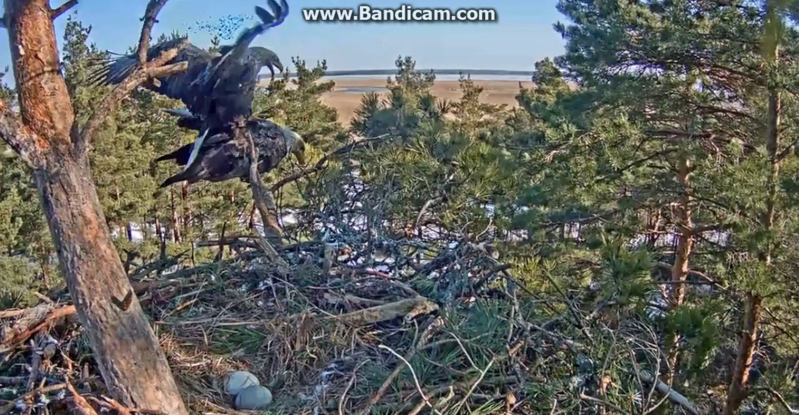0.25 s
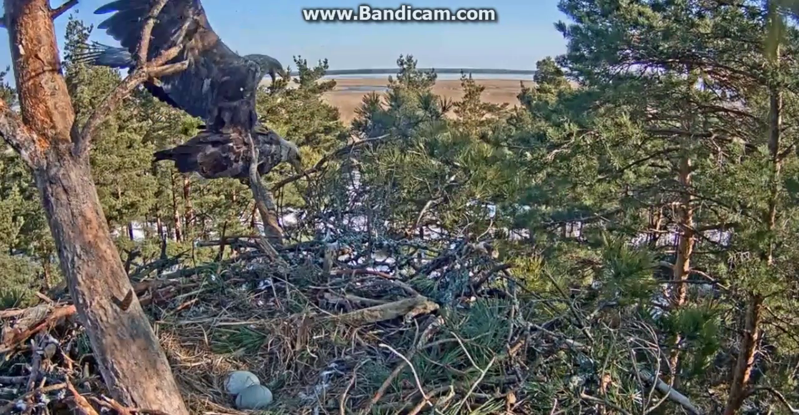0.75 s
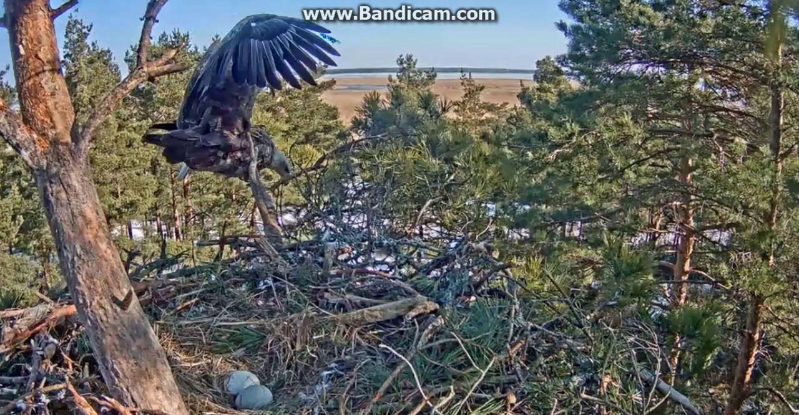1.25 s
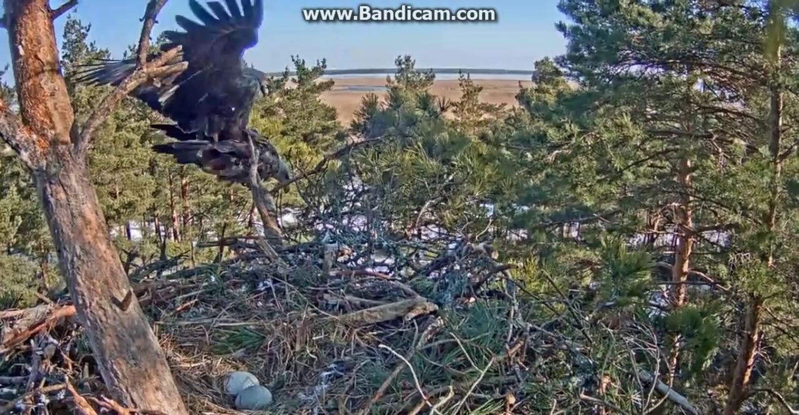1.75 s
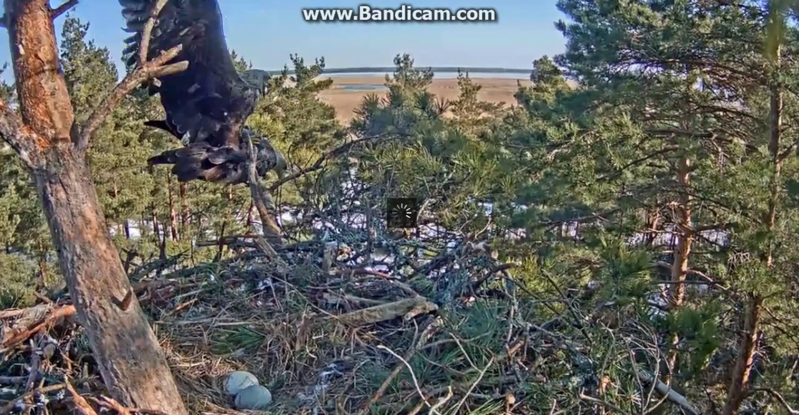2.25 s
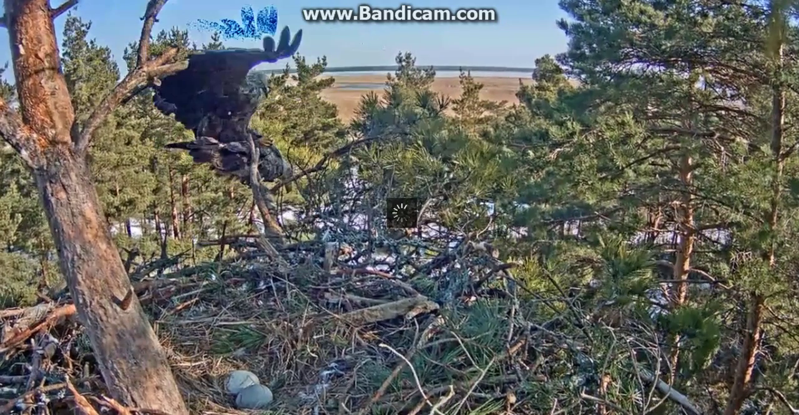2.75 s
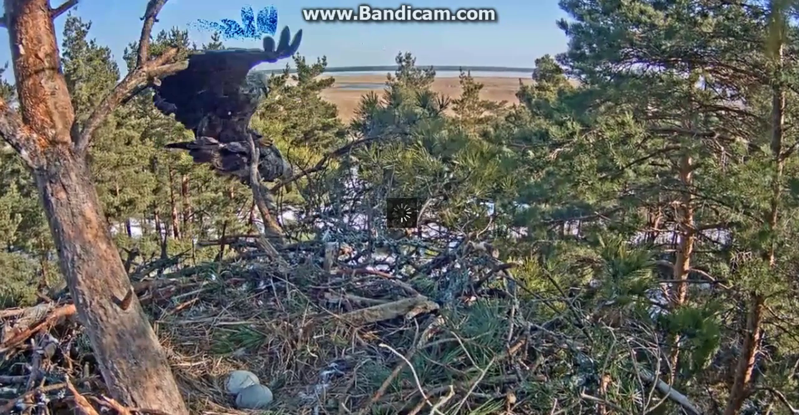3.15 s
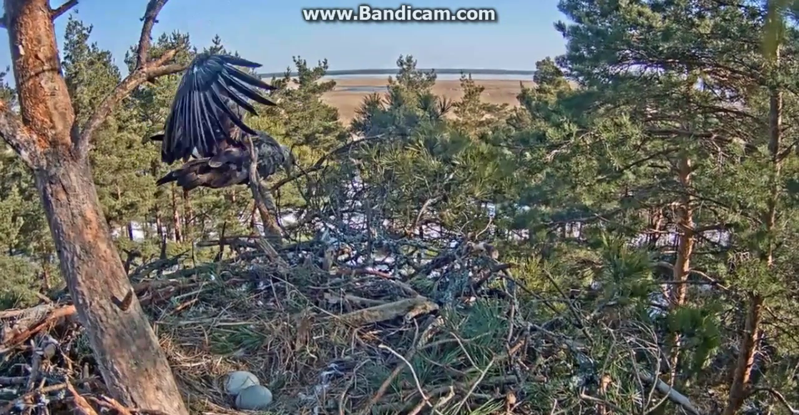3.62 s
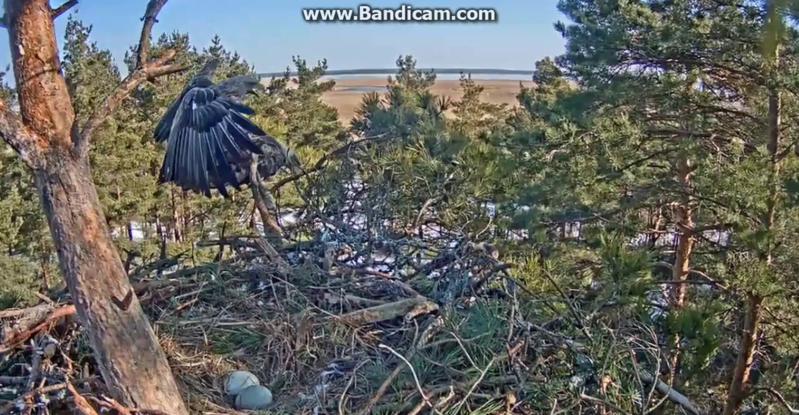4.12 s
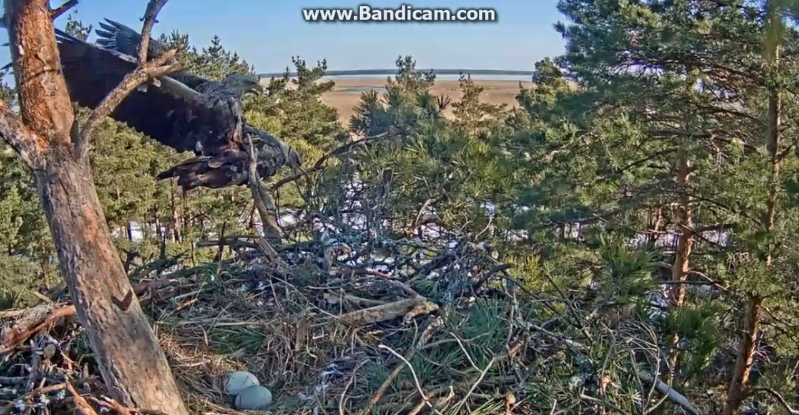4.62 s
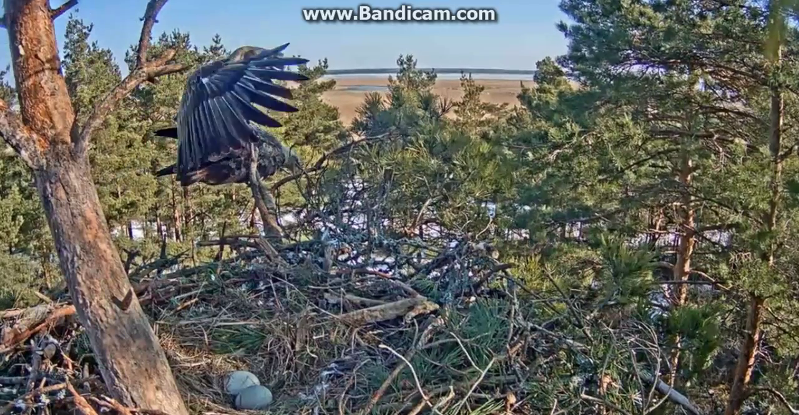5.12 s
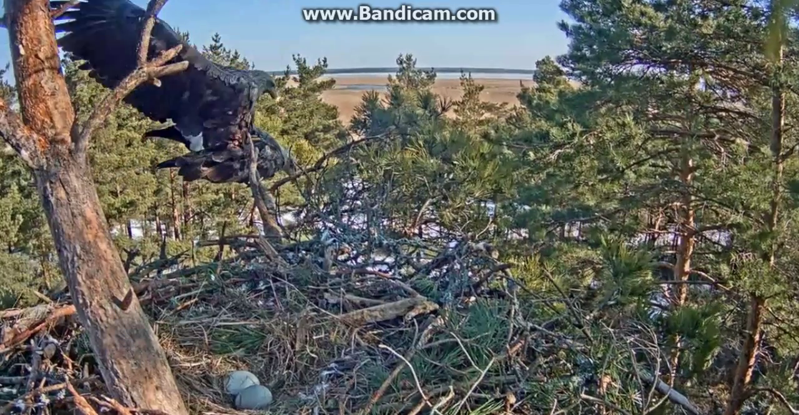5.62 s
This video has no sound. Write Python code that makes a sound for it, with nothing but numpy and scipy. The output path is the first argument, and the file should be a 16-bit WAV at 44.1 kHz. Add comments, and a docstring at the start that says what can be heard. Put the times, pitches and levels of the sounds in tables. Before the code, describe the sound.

Outdoors in a pine wood, a microphone by a nest picks up two eagles. The tail of a yelp is already sounding at the start, with a strong wing buffet. Short arched yelps follow at about 0.2, 0.6, 1.0, 1.3, 1.6 and 1.9 seconds, most cracking from a full, rough voice into a thin squeal, each ringing briefly in the trees. Low flaps and rustling feathers run beneath, with a hollow knock near 1.5. Tiny dropouts chop the sound early on, including a tenth-of-a-second gap at 0.9. From 2.15 to 3.3 the live sound stops, leaving faint flickering hiss. It returns abruptly with three plainer, lower, hoarse yelps at about 3.3, 3.7 and 4.1. Calling then ends. Soft wingbeats, rustle and light breeze continue, with two short dropouts near 4.5 and 4.9, muffled thuds from 4.7 onward, and a firm low knock with a dry snap at 5.8.

```python
"""Eagles mating above their nest

Two eagles in a pine wood give runs of arched yelps, harmonic tones with rough noise; the early ones crack
up into a thin squeal, and decaying filtered noise makes the trees ring after each. Shaped noise gives the
wingbeats, the rustle and the breeze; damped noise bursts give knocks and snaps on the branch. The nest
camera's live sound stalls several times, leaving a faint hiss, and the longest stall loses a little."""
import sys
import numpy as np
from scipy import signal
from scipy.fft import rfft, irfft, next_fast_len
from scipy.io import wavfile
from scipy.ndimage import uniform_filter1d, map_coordinates

SR = 44100
rng = np.random.default_rng(int(sys.argv[2]) if len(sys.argv) > 2 else 0)


def materialize(psi):
    """Save the field psi as 16-bit PCM at rate SR to the path in sys.argv[1].

    A 1-D psi becomes a single channel; in a 2-D psi each row is a channel.
    """
    bounded = np.clip(np.atleast_2d(psi).T, -1, 1)
    quanta = np.round(bounded * 32767).astype(np.int16)
    wavfile.write(sys.argv[1], SR, quanta)


N = 258867  # length of the scene [samples]
BREAK_HZ = 1750  # the voice flips register here
# stalls of the live sound: (start [s], end [s])
STALL_SPANS = [(.019, .058), (.259, .267), (.419, .43), (.879, .987), (2.149, 3.295), (4.482, 4.575),
               (4.93, 4.98)]


def amp(db):
    """Level to amplitude: 20 dB is a factor of ten."""
    return 10 ** (np.asarray(db) / 20)


def unit(x):
    """Normalisation of mean power: the signal scaled to rms 1."""
    return x / np.sqrt(np.mean(x ** 2) + 1e-20)


def along(points, hz):
    """Interpolation on a logarithmic frequency axis through (frequency [Hz], value) points."""
    f, v = np.transpose(points)
    return np.interp(np.log(hz + 1), np.log(f + 1), v)


def wobble(rate, size):
    """Slow random modulation: a smooth curve through normal random knots, `rate` of them a second."""
    knots = rng.standard_normal(int(size * rate / SR) + 4)
    return map_coordinates(knots, [np.arange(size) * rate / SR])


def filtered(x, response):
    """Linear filtering: the spectrum of x times a response of frequency."""
    m = next_fast_len(len(x) + 8192)
    spectrum = rfft(x, m) * response(np.fft.rfftfreq(m, 1 / SR))
    return irfft(spectrum, m)[:len(x)]


def noise(spectrum, size=N):
    """Spectral shaping: white noise coloured by (frequency [Hz], level [dB]) points, scaled to rms 1."""
    return unit(filtered(rng.standard_normal(size), lambda hz: amp(along(spectrum, hz))))


def eagles(shadow_hz=3300, shadow_db=-4):
    """Direct sound and reverberation: the birds face away, so their treble comes mostly by way of the trees."""
    # yelps: (time [s], start pitch [Hz], top pitch [Hz], rise [s], squeal [s], fall [s],
    # start level [dB], level at the end of the rise [dB], level as the fall begins [dB],
    # level added from the third harmonic up [dB])
    yelp_list = [ (-.165, 1188, 1973, 0.032, .09, .025, -22.5, -17.5, -26, -1.5),
                 (.224, 1227, 1950, .029, .084, 0.0055, -21, -10.5, -32, -2),
                 (.570, 1184, 1917, 0.028, 0.083, .033, -21, -14.5, -22.5, -1),
                 (0.847, 1122, 1869, .066, .029, .015, -23.5, -11, -22, 1),
                 (1.264, 1165, 1914, 0.04, .080, 0.018, -24.5, -13, -32.5, -0.5),
                 (1.601, 1321, 1885, .043, .049, 0.012, -22.5, -12.5, -28, -2),
                 (1.918, 1173, 1579, 0.11, 0, .025, -25, -16.5, -23, 1.5),
                 (3.327, 1164, 1527, 0.13, 0, 0.015, -25.5, -17.5, -24.5, 2.5),
                 (3.724, 1157, 1542, .108, 0, 0.015, -25, -17, -24.5, 3.5),
                 (4.125, 1197, 1434, 0.084, 0, 0.02, -24, -19.5, -21, 4.5)]
    lead = SR // 4  # the birds are already calling
    out = np.zeros(lead + N + 2 * SR)

    def shadow(hz):
        return amp(shadow_db / (1 + (shadow_hz / (hz + 1)) ** 6))

    for s, *shape, bright_db in yelp_list:
        lead_in, call = yelp(*arch(*shape), bright_db)
        heard = signal.fftconvolve(call, wood())  # the trees answer a little differently each time
        heard[:len(call)] += filtered(call, shadow)
        first = max(0, lead + unstalled(s + lead_in))
        out[first:][:len(heard)] += heard
    return out[lead:lead + N]


def arch(start_hz, top_hz, rise_s, squeal_s, fall_s, start_db, peak_db, fall_db, count=24):
    """Register change: time, pitch and level along an easing rise, a squeal above the break, a quick fall."""
    full_top_hz, flip_s = 1535, 0.0045  # top of the full voice before a crack; time a register change takes
    climb_s = .012  # pitch and level shoot up for about this long, then climb ever more slowly
    crest_sag = 0.016  # share of its pitch that a plain yelp loses just before the fall
    scoop, sag = .035, 0.086  # shares of its pitch by which the squeal starts and ends flat
    crack_db = -28.5  # the voice nearly stops as it cracks upward
    squeal_db, squeal_push_db = -23.5, 1.5  # level in the squeal's middle; how much louder its ends are
    fall_from, fall_to_hz = .915, 1158  # the fall starts at this share of the crest pitch
    fall_fade_db = 10.5  # level lost along the fall

    u = np.linspace(0, 1, count)
    cracks = top_hz > BREAK_HZ
    crest_hz = full_top_hz if cracks else top_hz
    climb = np.log1p(u * rise_s / climb_s) / np.log1p(rise_s / climb_s)
    rise_hz = start_hz + (crest_hz - start_hz) * climb
    if not cracks:
        rise_hz = rise_hz * (1 - crest_sag * u ** 8)
    parts = [(u * rise_s, rise_hz, start_db + (peak_db - start_db) * climb)]
    s = rise_s + flip_s
    if cracks:
        flat = scoop * (1 - u) ** 4 + sag * u ** 8
        parts.append(([rise_s + flip_s * 2 / 3], [crest_hz], [crack_db]))
        parts.append((s + u * squeal_s, top_hz * (1 - flat), squeal_db + squeal_push_db * (2 * u - 1) ** 2))
        s += squeal_s + flip_s
    fall_hz = (1 - u) * fall_from * crest_hz + u * fall_to_hz
    parts.append((s + u * fall_s, fall_hz, fall_db - fall_fade_db * u))
    return np.hstack(parts)


def yelp(s, pitch, db, bright_db, jitter=0.0025, break_jitter=0.029, break_width_hz=110, flutter_db=0.65,
         overtone_flutter_db=3, edge_s=0.0037, rasp_db=-31, break_rasp_db=-17, press_hz=1400, slack_db=5,
         strain_db=-17, dull_db=8, fall_jitter=.02, quaver_db=2):
    """Harmonic series plus turbulence, rough at the register flip and in the fall: start time [s] and samples."""
    # harmonics against the fundamental, in the full voice: (frequency [Hz], level [dB])
    full_voice = [(2250, -3), (2520, 0.5), (2790, -8), (3050, -11.5), (3700, -18.5), (4250, -20.5),
                  (4700, -25), (5600, -29.5), (6400, -36.5), (7400, -36), (8400, -49), (12000, -57),
                  (14000, -69.5)]
    # harmonics against the fundamental, in the squeal: (frequency [Hz], level [dB])
    squeal_voice = [(3700, -3.5), (5700, -15), (7700, -16.5), (9200, -33), (11500, -40), (13500, -54),
                    (15000, -71)]
    # air forced through the throat: (frequency [Hz], level before scaling [dB])
    throat_air = [(700, -22.5), (1300, -3), (2000, -12.5), (2650, 0), (3300, -14.5), (4150, 1.5),
                  (4900, -17), (5700, -7), (6500, -17), (7500, -7.5), (8400, -31), (14000, -41.5)]
    # noise burst at a register flip: (frequency [Hz], level before scaling [dB])
    flip_burst = [(700, -9.5), (1400, -7), (2300, 0), (3800, -13.5), (5000, -10.5), (7500, -13),
                  (8600, -23), (14000, -42.5)]
    blur = .08  # hoarseness: phase blur for each harmonic number [rad]

    t = np.arange(s[0] - edge_s, s[-1] + edge_s, 1 / SR)
    size = len(t)
    f0, level = np.interp(t, s, pitch), np.interp(t, s, db)
    squeal = np.clip(.5 + (f0 - BREAK_HZ) / break_width_hz, 0, 1)
    unstable = np.exp(-((f0 - BREAK_HZ) / break_width_hz) ** 2)
    # the low ends of the arch lose their top harmonics
    slack = np.clip(10 * (1 - f0 / press_hz), 0, 2)
    # past the top the voice turns dull and ragged
    fall = np.clip(10 * (1 - f0 / f0.max()), 0, 1) * (t > t[f0.argmax()])
    # the loudest swells do not lift the overtones
    swell_db = np.maximum(level - strain_db, 0)

    shake = jitter + break_jitter * unstable + fall_jitter * fall
    shaken_hz = f0 * (1 + shake * wobble(900, size) + 0.0027 * wobble(120, size))
    phase = 2 * np.pi * np.cumsum(shaken_hz) / SR
    gate = np.clip(np.minimum(t - t[0], t[-1] - t) / (2 * edge_s), 0, 1)
    voice = np.sin(phase) * amp(quaver_db * squeal * wobble(90, size))  # the squeal is unsteady
    for k in range(2, 10):
        overtone_db = (1 - squeal) * along(full_voice, k * f0) + squeal * along(squeal_voice, k * f0)
        overtone_db = overtone_db + bright_db * (k > 2) - slack_db * slack * (k > 3)
        overtone_db = overtone_db - swell_db - dull_db * fall + overtone_flutter_db * wobble(140, size)
        smear = blur * k * (1 - .6 * squeal) * wobble(600, size)  # higher harmonics are hoarser
        voice += gate * amp(overtone_db) * np.sin(k * phase + smear)
    voice = np.sqrt(2) * voice
    voice += amp(rasp_db + 3.2 * squeal) * noise(throat_air, size=size)
    voice += amp(break_rasp_db) * unstable * noise(flip_burst, size=size)
    return t[0], voice * gate * amp(level + flutter_db * wobble(250, size))


def wood(early_db=6, early_t60=0.15, echo_db=0, echo_s=.112, echo_width_s=0.0032):
    """Impulse response: scatter from near branches, a long ring from the trunks, an echo from a stand of pines."""
    # ring time of the trunks: (frequency [Hz], time to fall by 60 dB [s])
    ring_times = [(1400, 1.3), (2000, 0.98), (2800, 0.87), (4400, 0.78), (6000, 0.67), (12000, .5)]
    # colour of the whole response: (frequency [Hz], level [dB])
    wood_colour = [(1000, -22), (1500, -17), (1900, -8), (2400, -9), (2900, -2.5), (4000, -4.5), (5700, 0),
                   (7500, -1.5), (12000, -11.5)]
    hz, t, z = signal.stft(rng.standard_normal(SR), SR, nperseg=256)
    ring = amp(-60 * t / along(ring_times, hz)[:, None])
    near = amp(early_db - 60 * t / early_t60)
    echo = amp(echo_db) * np.exp(-((t - echo_s) / echo_width_s) ** 2)
    tail = signal.istft(z * (ring + near + echo) * (t > .002), SR, nperseg=256)[1]
    return filtered(tail / np.linalg.norm(tail), lambda f: amp(along(wood_colour, f)))


def wings(air_db=1.5, rustle_db=0, grain_db=3.5, swirl_db=2.0):
    """Turbulence and friction: each stroke swells and dies, pushing swirling air and brushing feathers over twigs."""
    # wing strokes: (time [s], decay time [s], air buffet before the gain air_db [dB], feather rustle [dB])
    strokes = [ (0.062, 0.073, -34.5, -45.5), (.205, 0.056, -39, -48), (0.38, .06, -43, -45),
               (0.856, .08, -47, -48), (1.247, .11, -39.5, -46), (1.446, 0.12, -37, -47.5),
               (1.65, 0.098, -41.5, -44), (1.896, 0.095, -38, -44.5), (3.315, 0.056, -40, -51),
               (3.637, 0.067, -52, -56), (3.81, 0.16, -44.5, -48), (4.141, 0.17, -48.5, -47.5),
               (4.455, 0.084, -46.5, -52), (4.62, 0.11, -43.5, -48.5), (4.89, 0.048, -43.5, -55),
               (5.065, 0.088, -38.5, -49), (5.477, .07, -40.5, -44.5)]
    # buffeting air: (frequency [Hz], level before scaling [dB])
    air_colour = [(15, -7.5), (40, 0), (80, -4), (150, -10.5), (400, -29), (900, -67)]
    # feathers on twigs: (frequency [Hz], level before scaling [dB])
    feather_colour = [(100, -8.5), (200, 0.5), (500, -2), (900, -10), (1400, -12.5), (1800, -28),
                      (2500, -23.5), (4000, -35), (8000, -37), (13000, -46.5), (15500, -56)]
    rise_share = 0.26  # build-up time of a stroke over its decay time
    # the birds never keep quite still; powers of separate sounds add
    buffet_power, rustle_power = amp(-53.5) ** 2, amp(-56.5) ** 2
    for s, length, buffet_db, feather_db in strokes:
        t = (np.arange(N) - unstalled(s)) / SR
        swell = np.exp(-np.maximum(t, -t / rise_share) / length)
        buffet_power = buffet_power + (amp(buffet_db) * swell) ** 2
        rustle_power = rustle_power + (amp(feather_db) * swell) ** 2
    air = unit(noise(air_colour) * amp(swirl_db * wobble(22, N)))
    brush = unit(noise(feather_colour) * amp(grain_db * wobble(90, N)))
    return amp(air_db) * np.sqrt(buffet_power) * air + amp(rustle_db) * np.sqrt(rustle_power) * brush


def branch(q=1.0, attack_s=0.0025, snap_t60=0.0063):
    """Damped impact: soft blows give dull, quickly damped thuds; dry twigs and bark give short bright snaps."""
    # blows of wing and foot: (time [s], level [dB], centre frequency [Hz], time to fall by 60 dB [s])
    knocks = [(1.168, -35.5, 560, 0.07), (1.464, -23, 410, 0.062), (1.465, -24.5, 785, 0.048),
              (1.52, -31, 640, 0.024), (4.685, -37, 218, 0.051), (4.876, -47, 253, 0.068),
              (5.059, -36.5, 223, 0.037), (5.229, -41, 197.5, 0.049), (5.408, -43, 1300, 0.033),
              (5.475, -34.5, 197, 0.11), (5.798, -22.5, 200, 0.039), (5.802, -29, 73, 0.13)]
    # snaps of dry twigs and bark: (time [s], level [dB])
    snaps = [(0.14, -38), (1.785, -46.5), (5.799, -35.5)]
    # colour of a snap: (frequency [Hz], level before scaling [dB])
    twig_colour = [(1000, 4), (2000, -2), (5000, -27.5), (7000, 4.5), (8500, -18.5), (14000, -22.5)]
    out = np.zeros(N + SR)
    t = np.arange(SR // 4) / SR
    for s, db, centre_hz, t60 in knocks:
        def resonance(f):
            return 1 / (1 + (q * (f / centre_hz - centre_hz / (f + 1))) ** 2)

        fade = amp(-60 * t / t60) * (1 - np.exp(-t / attack_s))
        thud = fade * filtered(rng.standard_normal(len(t)), resonance)
        # each thud has the energy of its envelope
        out[unstalled(s):][:len(t)] += amp(db) * thud * np.linalg.norm(fade) / np.linalg.norm(thud)
    for s, db in snaps:
        out[unstalled(s):][:len(t)] += noise(twig_colour, size=len(t)) * amp(db - 60 * t / snap_t60)
    return out[:N]


def breeze(db=-59, sway_db=1):
    """Aerodynamic noise: a soft, swaying rush of wind in the pines."""
    # wind in the needles: (frequency [Hz], level before scaling [dB])
    needle_colour = [(100, 6), (700, -7), (1400, -18), (1800, -17.5), (2500, -12.5), (3500, -20.5),
                     (6000, -20), (9000, -22.5), (13600, -24.5), (14200, -45.5)]
    return noise(needle_colour) * amp(db + sway_db * wobble(9, N))


def hiss(floor_db=-59.5, flicker_db=4.0, flicker_hz=900, width_hz=110):
    """Noise floor: a faint hiss whose low part flickers; a narrow noise band, a fuzzy tone, surfaces once."""
    # colour of the floor: (frequency [Hz], level before scaling [dB])
    floor_colour = [(20, 3.5), (40, 6), (120, -2), (300, -7), (720, -8), (1050, -18), (1700, -21.5),
                    (2200, -17), (3200, -22.5), (5800, -27.5), (7200, -33.5), (9000, -47), (15000, -58.5)]
    # the faint tone: (time [s], half length [s], frequency [Hz], level [dB])
    faint_tone = (2.89, .06, 1330, -68)
    floor = noise(floor_colour)
    low = filtered(floor, lambda hz: hz < flicker_hz)
    floor = floor - low + low * amp(flicker_db * wobble(75, N))
    s, length, pitch, db = faint_tone
    band = filtered(rng.standard_normal(N), lambda hz: np.exp(-((hz - pitch) / width_hz) ** 2))
    swell = np.exp(-((np.arange(N) / SR - s) / length) ** 2)
    return amp(floor_db) * floor + amp(db) * unit(band) * swell


def unstalled(s, buffer_s=1.02):
    """Buffered delay: the sample of the unbroken scene heard at time s; stalls past buffer_s lose the rest."""
    delay = sum(np.clip(s - start, 0, min(end - start, buffer_s)) for start, end in STALL_SPANS)
    return np.round(SR * (s - delay)).astype(int)


def scene():
    """Superposition: the pressures of all sources add at one microphone beside the nest."""
    return (eagles() + wings() + branch() + breeze())[None]


def record(dry, offset=0.021, top_hz=15780):
    """Gating and band limiting: live sound stops and resumes; hiss and a small constant offset stay."""
    live = np.ones(N)
    for start, end in STALL_SPANS:
        live[round(start * SR):round(end * SR)] = 0
    delayed = dry[0][unstalled(np.arange(N) / SR)]
    sound = delayed * live * uniform_filter1d(live, size=16) + hiss()
    return filtered(sound, lambda hz: hz < top_hz)[None] + offset


dry = scene()
out = record(dry)
materialize(out)
```